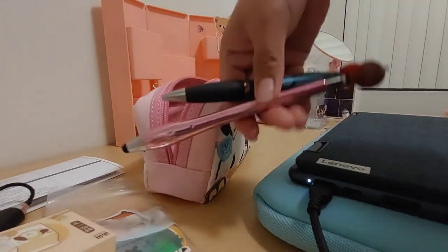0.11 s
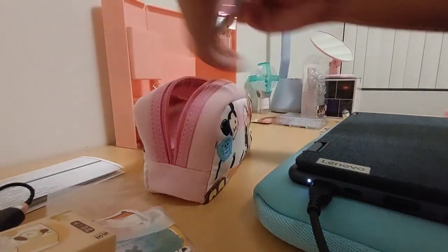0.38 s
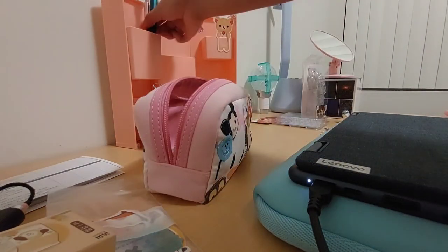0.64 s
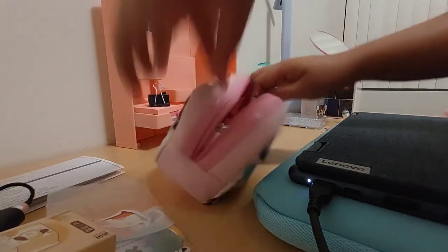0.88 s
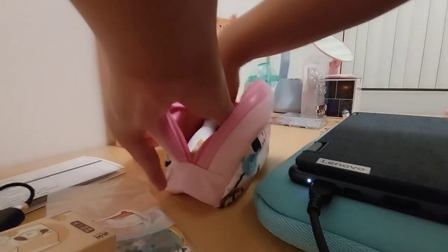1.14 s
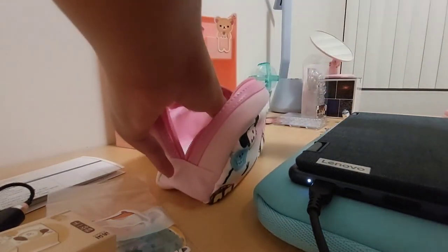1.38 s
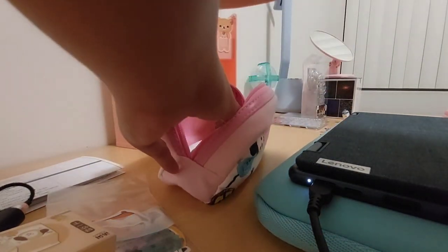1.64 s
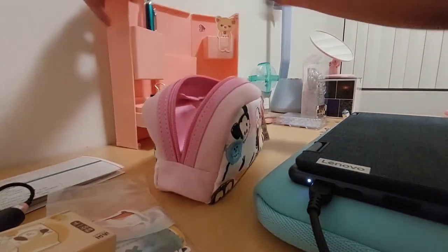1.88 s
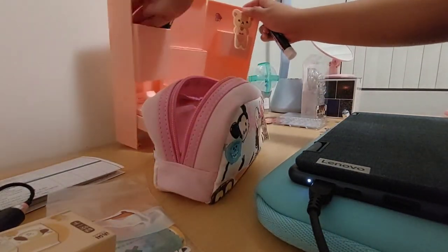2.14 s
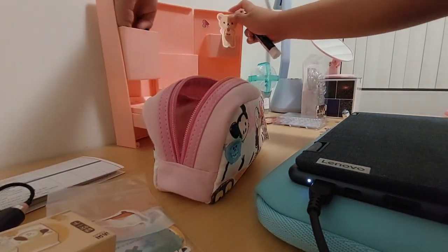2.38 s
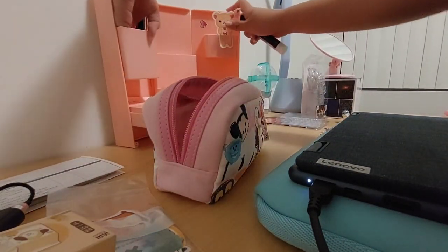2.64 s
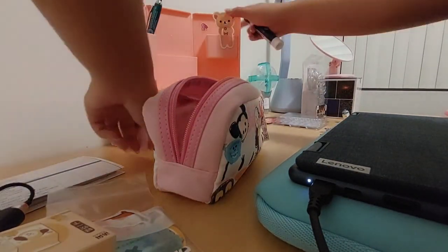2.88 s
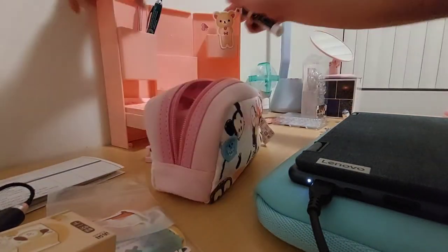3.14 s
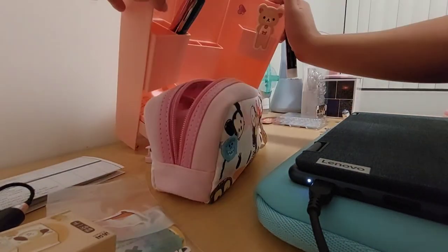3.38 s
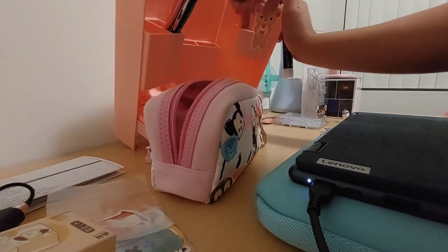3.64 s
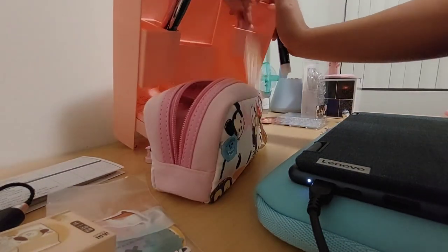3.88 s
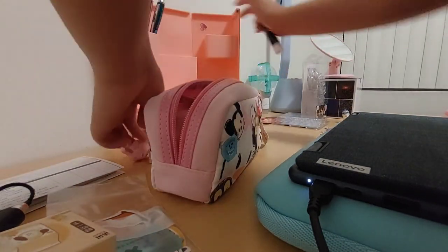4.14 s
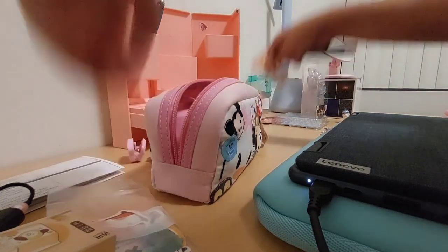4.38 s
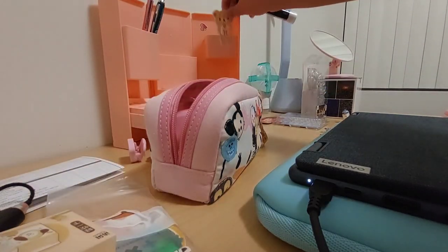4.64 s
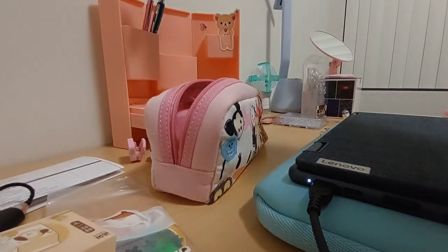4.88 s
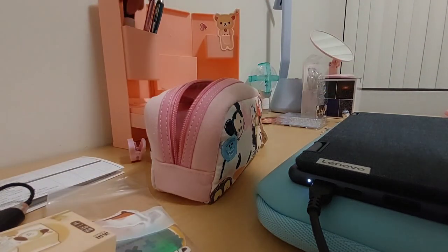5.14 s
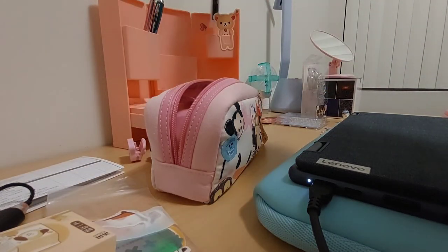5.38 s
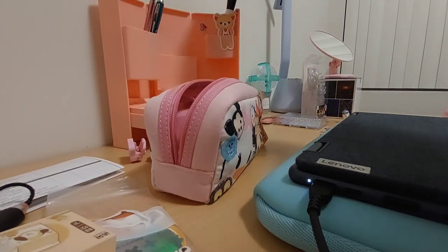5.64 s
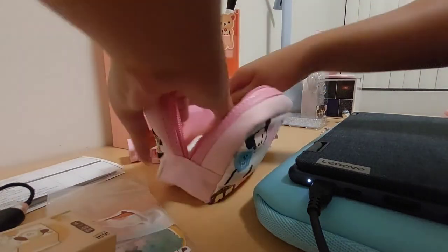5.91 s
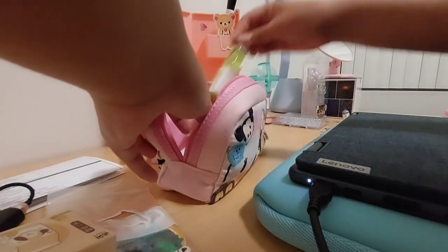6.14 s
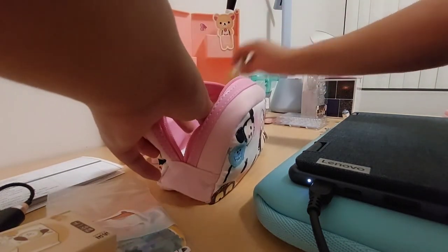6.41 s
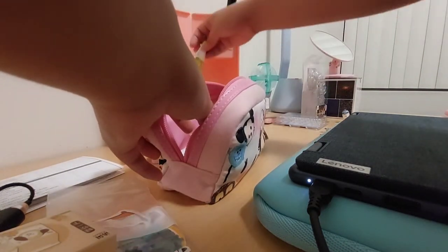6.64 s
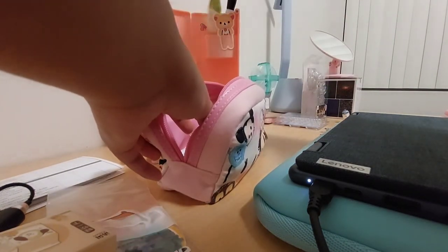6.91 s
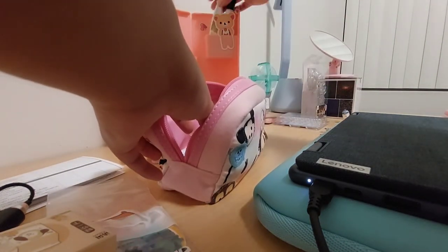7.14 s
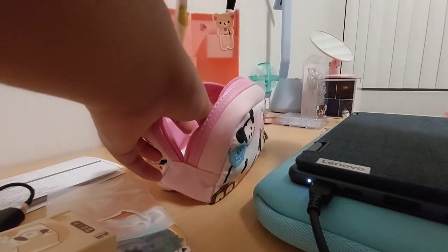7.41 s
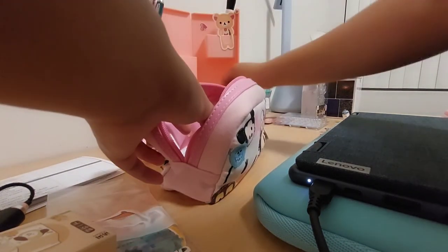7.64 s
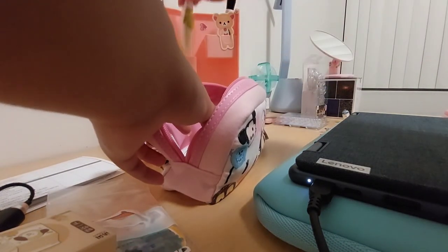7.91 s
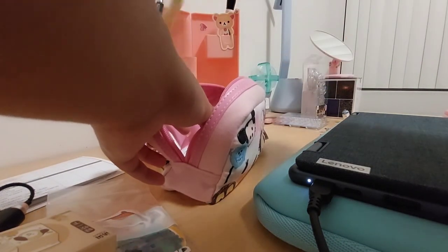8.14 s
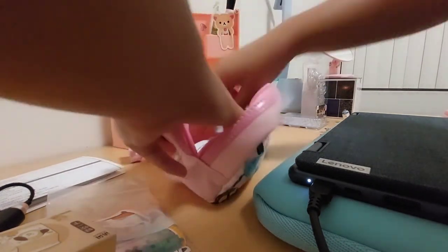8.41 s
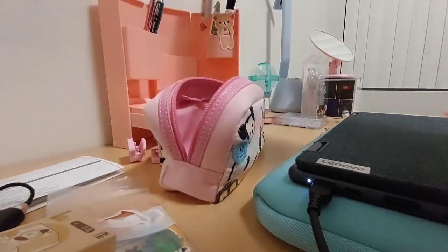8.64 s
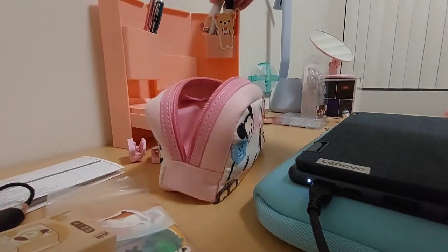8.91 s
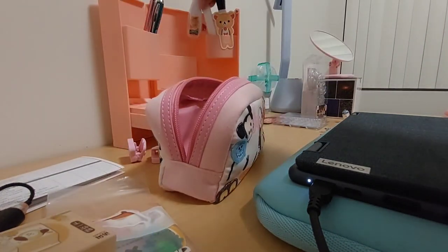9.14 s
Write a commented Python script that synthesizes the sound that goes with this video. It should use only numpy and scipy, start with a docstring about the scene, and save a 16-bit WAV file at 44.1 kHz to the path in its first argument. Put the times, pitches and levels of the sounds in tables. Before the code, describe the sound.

A small, dry, quiet room with a faint low hum and slight hiss, heard close up in stereo. At 0.2-0.3 s two crisp pen clicks, then at 0.5-0.7 a dull tap and a rattle with a short scraping ring. Soft cloth rubbing and small ticks around 1 s lead to firm hollow plastic knocks from 1.45, and a bright hard clatter at about 1.95. Knocks continue to 2.3; a heavy, low thud, the loudest event, lands near 2.67, followed by a sharp plastic clack at 2.9. Rustling and rattles at 3.1-3.3, a lull, then hollow knocks at 3.9-4.4. Lighter taps and short slides run from 4.9 to 5.8. It is nearly still at 6.1-6.6, then gentle taps, a firmer one at 7.3, and a brief ringing scrape at 7.5. A dull knock with pouch rubbing comes at 7.9-8.1, then muffled taps until about 9.25.

```python
"""Pens into a plastic organiser

Pens from a cloth pouch drop into a hollow plastic organiser on a wooden desk.
Each contact is a burst of noise collisions ringing modes: dull box and desk, bright hard plastic.
Sliding barrels sing in one narrow mode; cloth rustles as lumpy noise; a small quiet room hums faintly.
Two microphone ports hear each source with a lead, a tilt and a partial likeness."""
import sys
import numpy as np
from scipy import signal
from scipy.fft import rfft, irfft, next_fast_len
from scipy.io import wavfile
from scipy.ndimage import uniform_filter1d, map_coordinates

SR = 44100
rng = np.random.default_rng(int(sys.argv[2]) if len(sys.argv) > 2 else 0)


def volts_from_decibels(level):
    """Turn decibel levels (scalar or array-like) into linear amplitude factors."""
    exponent = np.asarray(level, float) / 20
    return 10 ** exponent


def master_out(mix):
    """Clip the mix to full scale and print it as 16-bit PCM to the path in sys.argv[1]."""
    frames = np.transpose(np.atleast_2d(mix))
    ceiling = np.clip(frames, -1, 1)
    pcm = np.round(ceiling * 32767).astype(np.int16)
    wavfile.write(sys.argv[1], SR, pcm)


N = 409248
SPAN = 8192  # samples per contact, peak in the middle


def unit(x):
    """Scale to rms 1."""
    return x / np.sqrt(np.mean(x ** 2) + 1e-20)


def along(points, hz):
    """Interpolate (frequency [Hz], value) points on a log axis."""
    point_hz, value = np.transpose(points)
    return np.interp(np.log(hz + 1), np.log(point_hz + 1), value)


def modes(table, hz, scatter_db):
    """Causal sum of resonances, strengths redrawn at each call."""
    gains = volts_from_decibels(scatter_db * rng.standard_normal(len(table)))
    total = 0
    for k, (centre_hz, width_hz, db) in enumerate(table):
        damping = 1j * hz * width_hz
        resonance = damping / (centre_hz * centre_hz - hz * hz + damping)
        total = total + (-1) ** k * gains[k] * volts_from_decibels(db) * resonance
    return total


def contacts(n, lumpy_db, grain_ms):
    """Two streams of tiny collisions sharing one uneven size."""
    position = np.arange(n) / (grain_ms * SR / 1000 + 1)
    size = map_coordinates(rng.standard_normal(n), [position], order=1)
    return rng.standard_normal((2, n)) * volts_from_decibels(lumpy_db * size)


# likeness of the two ports: (frequency [Hz], likeness [0-1])
PORT_LIKENESS = [(40, 0.7), (200, 1), (600, 0.7), (1400, 0.1), (3000, 0.1), (9000, 0.1)]
# level of the left port over the right: (frequency [Hz], level [dB])
PORT_LEAN = [(60, 10), (250, 1.3), (800, -0.65), (3000, 3.5), (12000, 2.1)]


def ports(pair, colour, lead_ms=.22, left_db=0):
    """Colour two unrelated excitations and mix to left and right; the left port hears lead_ms first."""
    m = next_fast_len(pair.shape[1])
    hz = np.fft.rfftfreq(m, 1 / SR)
    turn = np.arccos(np.clip(along(PORT_LIKENESS, hz), 0, 1)) / 2
    shared, own = rfft(pair, m) * colour(hz) * [np.cos(turn), np.sin(turn)]
    lead = np.exp(1j * np.pi * hz * lead_ms / 1000)  # half the lead per port
    tilt = volts_from_decibels((along(PORT_LEAN, hz) + left_db) / 2) * lead
    return irfft(np.array([(shared + own) * tilt, (shared - own) / tilt]), m)[:, :pair.shape[1]]


def patchy(x, depth_db):
    """Let a rustle's colour wander: random gain in patches of time and frequency, rms 1."""
    z = signal.stft(x, nperseg=512)[2]
    field = uniform_filter1d(rng.standard_normal(z.shape[1:]), size=12, axis=0)
    field = uniform_filter1d(field, size=5, axis=1)
    return unit(signal.istft(z * volts_from_decibels(depth_db * unit(field)), nperseg=512)[1][:, :N])


# room tone spectrum, relative: (frequency [Hz], density [dB/Hz])
HUM_SPECTRUM = [(15, -45), (25, -10), (134, 4), (180, -5.5), (317, -8.5), (489, -19), (911, -24.5),
                (1520, -29), (2840, -32), (6560, -36.5), (9570, -30.5), (16000, -39)]
HUM_DB = -68.5


def hum():
    """Steady room tone and microphone hiss: coloured noise."""
    return volts_from_decibels(HUM_DB) * unit(ports(contacts(N, 0.77, 43), lambda f: volts_from_decibels(along(HUM_SPECTRUM, f))))


# strokes on pouch and desk: (start [s], end [s], rubbing level [dB], cloth hiss level [dB])
STROKES = [(0.199, 0.247, -77.5, -61.5), (0.296, 0.445, -103, -74), (0.76, 0.76, -66, -88),
           (0.93, 1, -65, -74), (0.99, 1.264, -62, -64), (1.306, 1.353, -63.5, -68),
           (1.643, 2.004, -47.5, -60.5), (2.122, 2.357, -49, -62), (2.393, 2.513, -58, -72),
           (2.551, 2.673, -54, -76.5), (3.121, 3.255, -41, -67.5), (3.604, 3.691, -60.5, -72),
           (3.743, 3.965, -59.5, -77.5), (4.133, 4.488, -61.5, -73), (4.499, 4.722, -62.5, -86.5),
           (5.04, 5.143, -52, -66), (5.297, 5.331, -57, -74), (5.378, 5.444, -56, -79),
           (5.484, 5.575, -54.5, -77.5), (5.721, 6.018, -66.5, -72), (6.039, 6.18, -78.5, -68.5),
           (7.935, 8.075, -47, -69.5), (8.207, 8.268, -58.5, -68.5), (8.414, 8.543, -64, -73.5)]
# dull rub spectrum, relative: (frequency [Hz], density [dB/Hz])
RUB_SPECTRUM = [(40, -18.5), (120, 3.5), (350, 1), (900, -3.5), (1800, -15), (3500, -40)]
# cloth hiss spectrum, relative: (frequency [Hz], density [dB/Hz])
CLOTH_SPECTRUM = [(700, -19.5), (1500, -0.5), (2800, 1.5), (4500, -3), (7000, -4.5), (11000, -6),
                  (16000, -10)]
RELEASE_MS = 18  # the pouch settles after a stroke


def settle(gain):
    """Soften stroke edges; the release decays exponentially."""
    keep = np.exp(-1000 / (RELEASE_MS * SR))
    soft = uniform_filter1d(gain, round(0.006 * SR))
    return np.maximum(soft, signal.lfilter([1 - keep], [1, -keep], gain))


def hands():
    """Fingers drag over the pouch in strokes: a dull rub and a crinkly hiss, both in lumps."""
    rub_gain, hiss_gain = np.zeros((2, N))
    for start_s, end_s, rub_db, hiss_db in STROKES:
        start, end = round(start_s * SR), round(end_s * SR)
        sag_db = np.linspace(1.5, -1.5, end - start)  # the hand eases off
        rub_gain[start:end] = volts_from_decibels(rub_db + sag_db)
        hiss_gain[start:end] = volts_from_decibels(hiss_db + sag_db)
    rub = ports(contacts(N, 5.9, 10), lambda f: volts_from_decibels(along(RUB_SPECTRUM, f)))
    snaps = rng.random(N) < 260 / SR  # folds of the fabric, 260 per second on average
    creases = 1 + 4 * snaps * rng.exponential(size=N)
    hiss = ports(contacts(N, 3.8, 14) * creases, lambda f: volts_from_decibels(along(CLOTH_SPECTRUM, f)))
    return settle(rub_gain) * patchy(rub, 1.4) + settle(hiss_gain) * patchy(hiss, 4)


# decay of the room's tail: (frequency [Hz], t60 [s])
ROOM_T60 = [(200, .07), (2000, .09), (10000, .065)]


def room(x):
    """Noise tail, redrawn every third of a second; each frequency dies at its own speed."""
    step, out = SR // 3, np.zeros((2, N + SR))
    for a in range(0, N, step):
        hz, t, z = signal.stft(rng.standard_normal((2, SR // 4)), SR, nperseg=256)
        decay = volts_from_decibels(-60 * t / along(ROOM_T60, hz)[:, None])
        tail = signal.istft(z * decay, SR, nperseg=256)[1]
        wet = signal.fftconvolve(x[:, a:a + step], tail / np.linalg.norm(tail[0]), axes=1)
        out[:, a + 150:][:, :wet.shape[1]] += wet  # 150 samples of pre-delay
    return out[:, :N]


# where the hands work: (time [s], lead of the left port [ms], level toward the left [dB])
HAND_PLACE = [(0.2, .4, 2), (0.7, .4, -1.5), (1.5, 0.27, 0), (2.8, .3, -0.5), (4.2, .3, -1),
              (5.2, .3, -0.5), (6.1, 0.064, 1.5), (7.2, 0.055, -1), (9.2, 0.11, 1.5)]


def add(track, s, db, rise_ms, fall_ms, colour, lumpy_db, grain_ms, ring_ms, blow):
    """One rattle: collisions swell to a main blow and die away, ringing through a body."""
    ms = (np.arange(SPAN) - SPAN // 2) * 1000 / SR
    bend = np.where(ms < 0, 2.4, 1.6)  # round top, steep ends

    def slope(fall):
        distance = np.where(ms < 0, -ms / max(rise_ms, .2), ms / max(fall, .2))
        return volts_from_decibels(-10 * distance ** bend)

    # the body's ring lengthens the fall
    push = unit(contacts(SPAN, lumpy_db, grain_ms)) * slope(fall_ms - ring_ms)
    push[:, SPAN // 2] += blow * np.sqrt(np.sum(push ** 2) / 2)
    when, lead_ms, left_db = np.transpose(HAND_PLACE)
    sound = ports(push, colour, np.interp(s, when, lead_ms), np.interp(s, when, left_db))
    # set the energy to that of the nominal envelope
    sound *= volts_from_decibels(db) * np.sqrt(2 * np.sum(slope(fall_ms) ** 2) / np.sum(sound ** 2))
    track[:, round((s - ring_ms / 2000) * SR):][:, :SPAN] += sound


# a barrel sliding along an edge: (peak [s], level [dB], first 10 dB of fall [ms], pitch [Hz])
SLIDING_SINGS = [(.607, -41, 39.5, 930), (0.629, -43.5, 4, 1640), (1.155, -49.5, 8, 2470),
                 (0.626, -46.5, 20, 3270), (1.929, -42, 10, 4500), (5.08, -54.5, 27, 3200),
                 (7.301, -60.5, 15, 2060), (7.515, -45.5, 14.5, 772), (7.6, -56, 25, 3550),
                 (7.87, -51, 17, 3000)]
SING_RISE_MS = 13


def sings(track):
    """Sliding feeds noise into one narrow mode."""
    for s, db, fall_ms, hz in SLIDING_SINGS:
        add(track, s, db, SING_RISE_MS, fall_ms, lambda f: modes([(hz, 0.045 * hz, 0)], f, 0), 2, 3, 1.5, 0)


# sudden taps on box and desk:
# (peak [s], level [dB], first 10 dB of fall [ms], pitch centre [Hz], hardness [dB])
BOX_TAPS = [(0.504, -35, 21, 536, -18.5), (0.601, -63, 24, 940, -19), (0.871, -49.5, 21.5, 556, -2.5),
            (1.137, -43, 24.5, 610, -4.5), (1.202, -52.5, 16.5, 774, -1), (1.249, -38, 6, 120, -29),
            (1.341, -51, 10.5, 470, -13.5), (1.461, -25, 16, 430, -18.5), (1.579, -41, 11, 420, -18),
            (1.642, -34.5, 32.5, 268, -34.5), (1.81, -33, 5.5, 350, -18), (1.827, -35.5, 12, 740, -10.5),
            (1.872, -48, 56, 230, -12.5), (1.948, -24.5, 5, 437, -12), (2.127, -51, 37, 350, -35),
            (2.16, -37, 6, 337, -16.5), (2.222, -26, 4, 164, -15), (2.471, -60, 18.5, 490, -6.5),
            (2.567, -49, 19.5, 595, -16), (2.8, -42, 24, 290, -35), (2.916, -28, 37.5, 750, -2),
            (3.132, -46.5, 34, 187, -6), (3.163, -32.5, 42.5, 254, -23), (3.683, -51, 5, 653, -24),
            (3.822, -47.5, 39, 320, -13.5), (3.894, -29.5, 16, 620, 0), (4.104, -25, 17.5, 430, -24.5),
            (4.265, -50, 72, 457, -19.5), (4.349, -37.5, 35, 680, -9.5), (4.673, -39.5, 5, 500, -21.5),
            (4.999, -31, 3, 763, -16), (5.012, -44, 21, 295, -18), (5.314, -55, 14, 290, -11),
            (5.361, -35.5, 11.5, 854, -19.5), (5.496, -47, 12.5, 855, -15.5),
            (6.656, -42.5, 20, 495, -14.5), (6.794, -48.5, 10.5, 385, -10), (7.303, -31.5, 27, 340, -25),
            (7.51, -39, 28.5, 420, -11), (7.58, -46.5, 16, 600, -7.5), (7.938, -28.5, 19, 405, -17.5),
            (8.305, -54, 22, 393, -10), (8.652, -47.5, 20, 320, -10.5), (8.676, -35.5, 28.5, 366, -15),
            (8.748, -47, 19.5, 247, -22), (8.995, -48.5, 26, 605, -13), (9.249, -41, 28, 480, -19.5)]
# rattles that swell and fade:
# (peak [s], level [dB], first 10 dB of fall [ms], pitch centre [Hz], hardness [dB])
BOX_RATTLES = [(0.623, -40.5, 14, 780, -8.5), (0.669, -32, 21, 560, -14.5), (0.741, -53.5, 13.5, 503, -11),
               (1.033, -54, 61, 483, -4.5), (1.118, -47, 11, 670, -5), (1.228, -54.5, 24, 360, -14.5),
               (1.326, -52.5, 13.5, 520, -12), (1.483, -25, 22, 790, -5), (1.763, -24.5, 12, 557, -9.5),
               (1.969, -27, 17, 660, -8), (2.177, -53, 19, 433, -9), (2.243, -37.5, 30, 272, -14),
               (2.318, -37.5, 27, 176, -17), (2.666, -12, 13, 320, -31), (3.085, -47.5, 17.5, 720, 0),
               (3.249, -28, 15, 360, -15), (3.32, -63, 18.5, 399, -22), (3.52, -61.5, 21.5, 496, -13.5),
               (3.65, -52, 22.5, 540, -13), (3.762, -53.5, 20, 362, -10.5), (3.873, -43.5, 20, 248, -12.5),
               (4.037, -37, 20.5, 406, -0.5), (4.137, -28, 8, 320, -21), (4.549, -49.5, 14, 237, -28.5),
               (4.621, -55.5, 43, 1000, -16), (4.943, -33.5, 17.5, 490, -21), (5.128, -43, 21, 355, -10.5),
               (5.207, -32.5, 15.5, 700, -10.5), (5.543, -38, 17, 367, -14), (5.637, -48, 21, 255, -20.5),
               (6.705, -46.5, 11, 470, -16), (6.732, -46.5, 26, 163, -34.5), (6.893, -56.5, 13.5, 596, -18),
               (6.942, -53.5, 16, 353, -15.5), (7.197, -44, 28, 510, -7.5), (7.612, -42, 21, 560, -7.5),
               (7.729, -40.5, 14, 320, -20.5), (7.873, -37.5, 22, 700, -10), (8.033, -33.5, 10, 352, -16),
               (8.054, -33.5, 10.5, 317, -17.5), (8.129, -48, 16, 380, -8.5), (8.243, -37.5, 16, 294, -10),
               (8.798, -46, 15.5, 210, -18), (8.957, -58, 14, 210, -13), (9.148, -38, 21.5, 241, -13),
               (9.232, -49, 29, 304, -14)]
# slides that end against a wall:
# (stop [s], level [dB], last 10 dB of rise [ms], pitch centre [Hz], hardness [dB])
WALL_SLIDES = [(1.698, -39, 18.5, 644, -8), (2.724, -25, 40, 570, -9.5), (2.901, -33, 16.5, 521, -10),
               (4.092, -37, 15.5, 280.6, -30), (4.477, -55.5, 29, 99, -31), (5.417, -37, 25, 346, -30),
               (5.756, -52.5, 32, 350, -31), (5.94, -68.5, 50, 1210, 4.5), (5.993, -54, 16, 670, 5.5),
               (6.686, -41, 18.5, 343, -14.5), (7.246, -52, 17, 200, -24.5)]
TAP_RISE_MS, RATTLE_RISE_PER_FALL, STOP_FALL_MS = 3, 0.78, 9.8


def blows():
    """List every dull contact as (s, dB, rise ms, fall ms, Hz, hardness dB)."""
    taps = [(s, db, TAP_RISE_MS, ms, hz, hard_db) for s, db, ms, hz, hard_db in BOX_TAPS]
    rattles = [(s, db, RATTLE_RISE_PER_FALL * ms, ms, hz, hard_db)
               for s, db, ms, hz, hard_db in BOX_RATTLES]
    slides = [(s, db, ms, STOP_FALL_MS, hz, hard_db) for s, db, ms, hz, hard_db in WALL_SLIDES]
    return taps + rattles + slides


# hard plastic shells, relative: (frequency [Hz], width [Hz], level [dB])
SHELL_MODES = [(4500, 1700, -6.5), (5370, 450, 1.5), (7200, 3600, -6.5), (7600, 2200, -5),
               (9900, 4900, -6.5), (14000, 3400, -6), (16500, 1000, -11)]
# single clicks of pen on pen: (time [s], level [dB], sharpness [dB])
PEN_CLICKS = [(0.225, -27.5, 10), (0.299, -28.5, -6), (1.121, -54.5, -3), (1.153, -67, 2), (1.199, -56, 10),
              (1.246, -52, -0.5), (1.327, -52, 4), (1.486, -37, -8.5), (1.947, -52.5, -1),
              (2.176, -39, -9.5), (2.217, -42, -3), (2.303, -46, -15.5), (2.405, -58, 0), (2.459, -56, 3),
              (2.667, -57, -9), (2.719, -36, -4), (2.937, -20.5, -4), (3.158, -52.5, -23),
              (3.894, -27.5, -26.5), (4.104, -31, 7.5), (4.135, -56.5, 0), (4.351, -40.5, 7),
              (4.554, -53, 4.5), (5.209, -47, 1.5), (5.779, -48, 9), (5.85, -53, 2), (5.88, -62, -5),
              (6.055, -45, 2.5), (6.119, -47, 1), (8.429, -41, 1.5)]
# pens clattering together: (peak [s], level [dB], first 10 dB of fall [ms], sharpness [dB])
PEN_CLATTERS = [(1.067, -55.5, 47, -5), (1.146, -63, 27, -3), (1.342, -55.5, 13.5, 11),
                (1.654, -52.5, 9, -29.5), (1.697, -47.5, 5, -16), (1.764, -39, 15.5, -25),
                (1.929, -42, 16.5, -4.5), (1.968, -17.5, 10, -2), (2.153, -58.5, 12.5, 7),
                (2.225, -57.5, 8.5, 6), (2.348, -55.5, 8.5, -7.5), (2.713, -41, 14, -0.5),
                (2.918, -27.5, 16.5, -5.5), (2.986, -59.5, 9.5, -17.5), (3.085, -55, 11.5, -5.5),
                (3.132, -50, 10, -2.5), (3.235, -34.5, 3, 5.5), (3.248, -34.5, 9.5, 4),
                (3.919, -46, 11.5, 0.5), (4.034, -36, 19, -14), (4.111, -46.5, 8.5, 20),
                (4.457, -58.5, 26, -2), (4.997, -45.5, 1.5, -37), (5.99, -53.5, 15, 4.5),
                (7.938, -45, 8.5, -6), (8.44, -54, 11, 11), (8.673, -55.5, 17, -4.5),
                (9.142, -46, 13, -2.5)]
CLICK_RISE_MS, CLICK_FALL_MS, CLATTER_RISE_PER_FALL = 0.29, 2.1, 0.41
# shells woken by a knock: level over the wall's ring, sharpness, share of the knock's length
SHELL_OVER_WALL_DB, SHELL_SHARP_DB, SHELL_LENGTH_SHARE = -15.5, -1.5, 0.58


def clacks(track):
    """Clicks, clatters and each knock's faint clack; sharpness tilts the shells' ring to the top."""
    clicks = [(s, db, CLICK_RISE_MS, CLICK_FALL_MS, sharp_db) for s, db, sharp_db in PEN_CLICKS]
    clatters = [(s, db, CLATTER_RISE_PER_FALL * ms, ms, sharp_db) for s, db, ms, sharp_db in PEN_CLATTERS]
    woken = [(s, db + hard_db + SHELL_OVER_WALL_DB, SHELL_LENGTH_SHARE * rise_ms,
              SHELL_LENGTH_SHARE * fall_ms, SHELL_SHARP_DB)
             for s, db, rise_ms, fall_ms, hz, hard_db in blows()]
    for s, db, rise_ms, fall_ms, sharp_db in clicks + clatters + woken:
        tilt = [(2500, 4.0), (5500, -3), (12000, sharp_db), (15600, sharp_db), (16500, sharp_db - 12.5)]
        add(track, s, db, rise_ms, fall_ms,
            lambda f: modes(SHELL_MODES, f, 5.7) * volts_from_decibels(along(tilt, f)), 2.4, 1.2, .3, .24)


# organiser and desk top, relative: (frequency [Hz], width [Hz], level [dB])
BOX_MODES = [(120, 30, 5.5), (210, 88, 1.5), (320, 180, 2), (426.9, 140, -1.5), (510, 78, -4.5),
             (700, 72, -2.5), (850, 160, -5), (1196, 200, -8)]
# pen barrels against the box wall, relative: (frequency [Hz], width [Hz], level [dB])
WALL_MODES = [(1520, 980, 24.5), (2150, 450, -8), (2444, 450, 5), (3300, 500, 0), (3800, 240, -6.5),
              (5163, 910, 0.5)]
# the desk's frame, relative: (frequency [Hz], width [Hz], level [dB])
DESK_MODES = [(46.8, 59, -8), (91, 74, -3.5), (137, 50, -5.5)]


def knocks(track):
    """Blows wake the box modes near their pitch; hardness feeds the wall's upper modes."""
    for s, db, rise_ms, fall_ms, hz, hard_db in blows():
        near = lambda f: 1j * f * hz / (hz * hz - f * f + 1j * f * hz * 1.4)
        add(track, s, db, rise_ms, fall_ms,
            lambda f: modes(BOX_MODES, f, 3.1) * near(f), 2.5, 3, 3.5, .25)
        add(track, s, db + hard_db, 1.036 * rise_ms, 0.94 * fall_ms,
            lambda f: modes(WALL_MODES, f, 0.81), 4.5, 2.5, 1.2, .2)
        thump_db = db - 14.5 - 6 * np.log2(hz / 300)  # the lower the blow, the more it shakes the desk
        add(track, s, thump_db, rise_ms, fall_ms, lambda f: modes(DESK_MODES, f, 3.6), 1.5, 5, 4, .6)


def scene():
    """Pens in the room, over hands and hum."""
    track = np.zeros((2, N + 2 * SPAN))
    knocks(track)
    clacks(track)
    sings(track)
    pens = track[:, SPAN // 2:][:, :N]
    return pens + volts_from_decibels(-13.5) * room(pens) + hands() + hum()


def top_cut(x):
    """Nothing passes above the cut-off."""
    return signal.sosfilt(signal.butter(12, 16810, fs=SR, output="sos"), x)


def record(dry):
    """Pass on the finished mix."""
    return top_cut(dry)


dry = scene()
out = record(dry)
master_out(out)
```